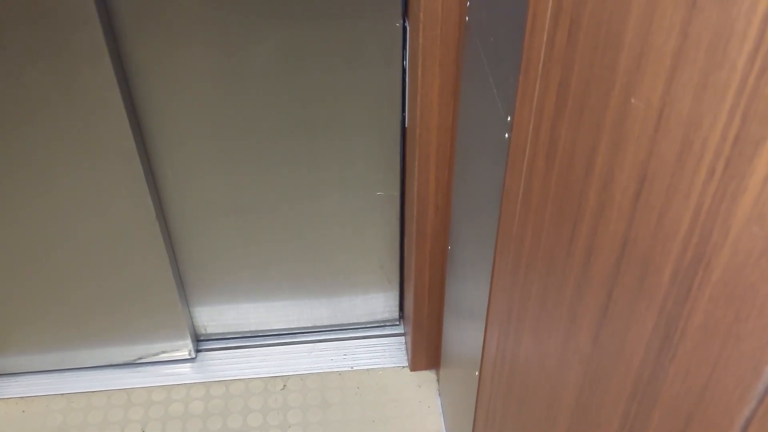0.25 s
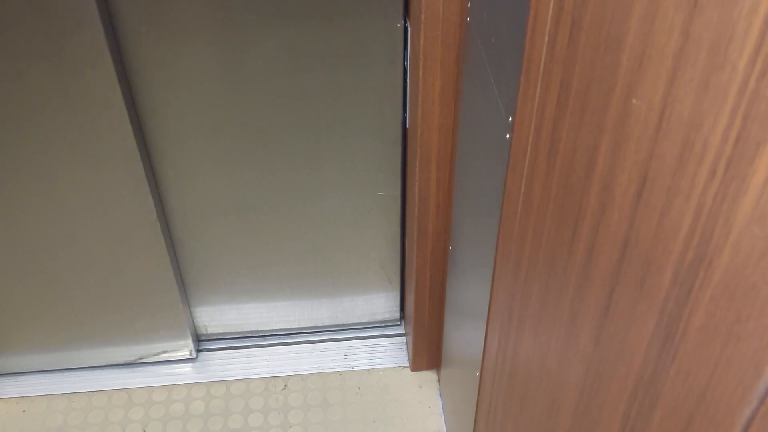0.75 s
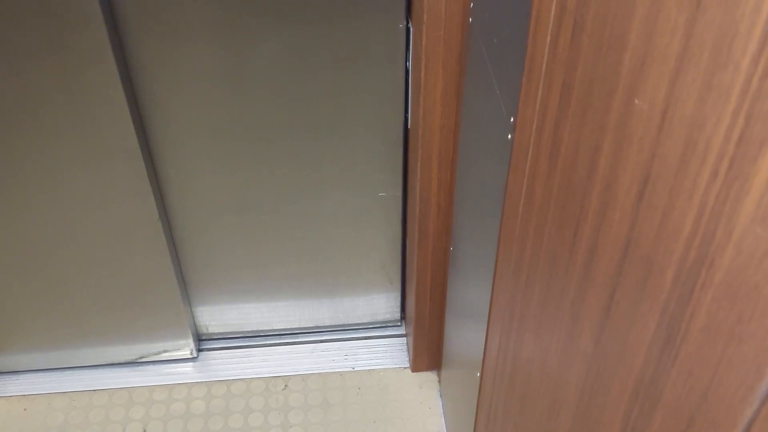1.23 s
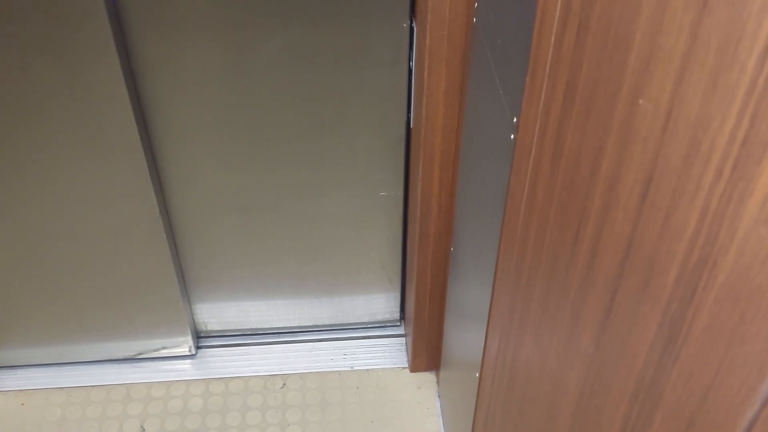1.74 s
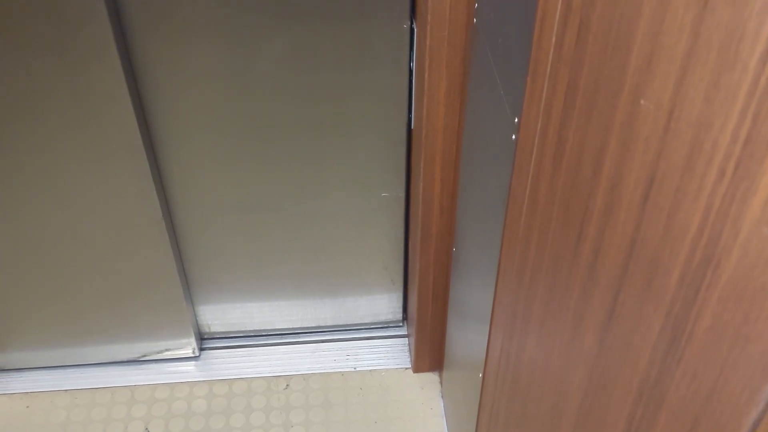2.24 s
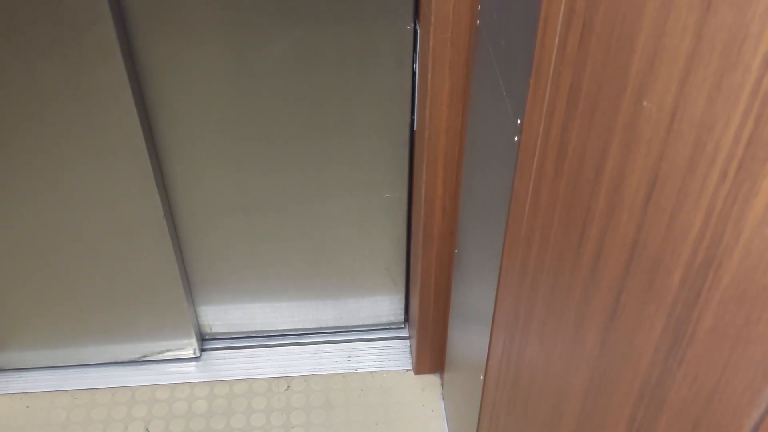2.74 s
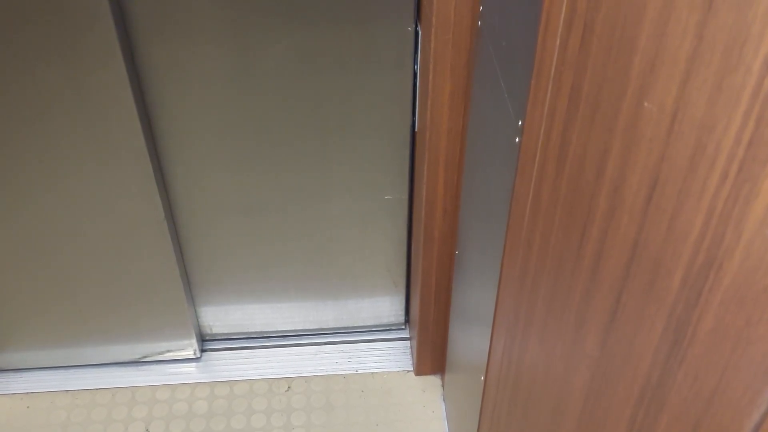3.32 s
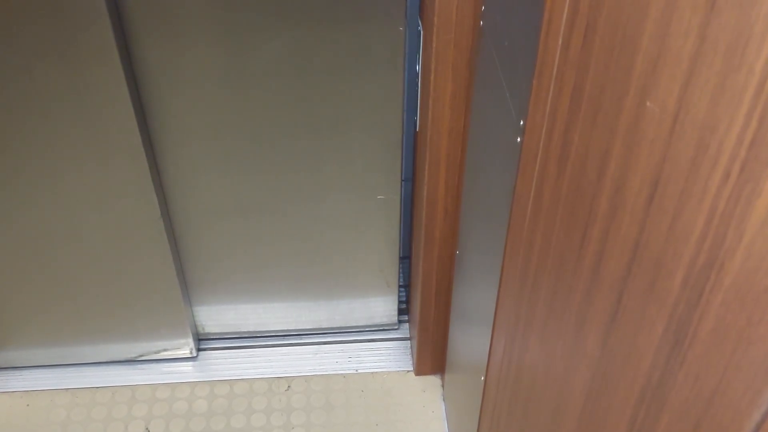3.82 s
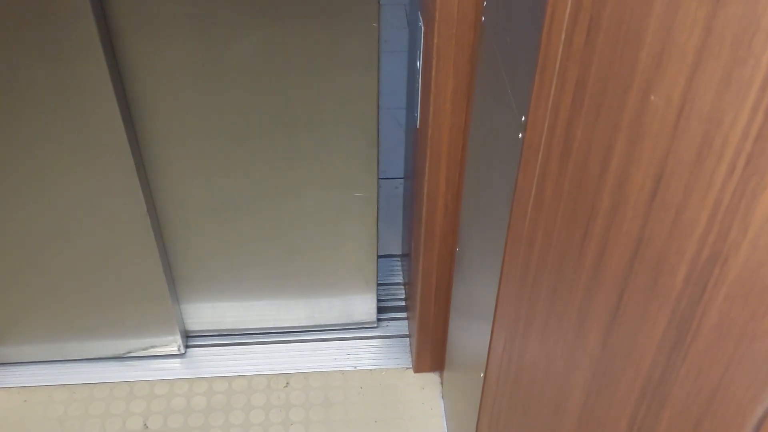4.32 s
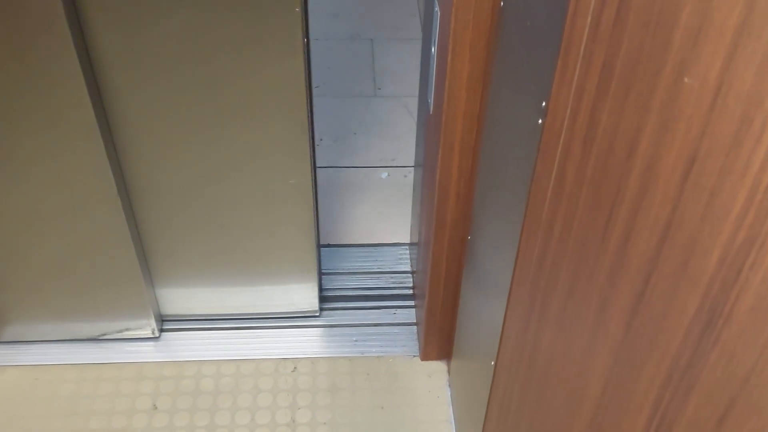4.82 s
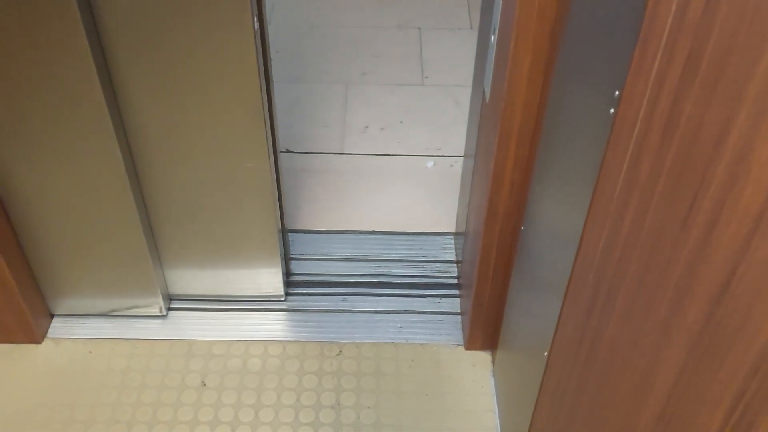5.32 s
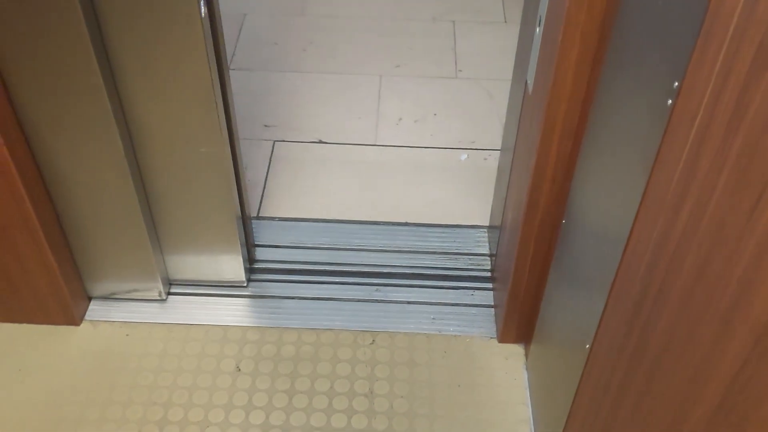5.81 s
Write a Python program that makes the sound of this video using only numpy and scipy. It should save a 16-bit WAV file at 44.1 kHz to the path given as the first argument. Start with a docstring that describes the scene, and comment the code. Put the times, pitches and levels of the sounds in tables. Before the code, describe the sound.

Inside a small elevator, a low wavering hum slows, the car stops with heavy clunks and thumps, then steel doors roll open with a rumbling whir.

```python
"""Inside a small elevator car: under a faint switching whistle, the hum of the drive and shaped rumble carry it
along the shaft, with wavering sine drones of the panels that fade in and out and a light rustle of the guides.
It slows and stops with a clunk and a heavy thump: noise bursts and struck modes that ring on in the hard cabin.
The door coupler whines in narrow noise bands as it takes up its slack, and the lock clicks.
Two steel panels then roll open: rumble, scrape and hiss follow the door speed over throbbing drive tones."""
import sys
import numpy as np
from scipy import signal
from scipy.fft import rfft, irfft, next_fast_len
from scipy.io import wavfile
from scipy.ndimage import uniform_filter1d, map_coordinates

SR = 44100
rng = np.random.default_rng(int(sys.argv[2]) if len(sys.argv) > 2 else 0)


def digitize_waveform(pressure):
    """Quantize a signal to 16-bit integers and store it at the path in sys.argv[1].

    Rows of a 2-D input are taken as channels; values are limited to [-1, 1].
    """
    field = np.atleast_2d(pressure).T
    bounded = np.clip(field, -1, 1)
    quanta = np.round(bounded * 32767).astype(np.int16)
    wavfile.write(sys.argv[1], SR, quanta)


N = 267290  # length in samples


def amp(db):
    """Level law: decibels to amplitude gain."""
    return 10 ** (np.asarray(db) / 20)


def unit(x):
    """Normalisation: scale to rms 1."""
    return x / np.sqrt(np.mean(x ** 2) + 1e-20)


def along(points, hz):
    """Logarithmic interpolation: read (f/Hz, value) points on a log frequency axis."""
    f, value = np.transpose(points)
    return np.interp(np.log(hz + 1), np.log(f + 1), value)


def curves(rows):
    """Linear interpolation: one value per sample for each column after the time."""
    s, *columns = np.transpose(rows)
    return [np.interp(np.arange(N) / SR, s, column) for column in columns]


def wobble(rate):
    """Band-limited fluctuation: a smooth random curve with rate knots per second."""
    knots = rng.standard_normal(1024)
    return map_coordinates(knots, [np.arange(N) * rate / SR], mode="mirror")


def swell(start, end, fade):
    """Amplitude envelope: a sine-shaped gain that fades in from start and out towards end, all in s."""
    t = np.arange(N) / SR
    return np.sin(np.pi / 2 * np.clip(np.minimum(t - start, end - t) / fade, 0, 1))


def tone(hz, drift, rate):
    """Frequency modulation: a sine of rms 1 whose pitch wanders by the share drift."""
    cycles = np.cumsum(hz * (1 + drift * wobble(rate))) / SR
    return np.sqrt(2) * np.sin(2 * np.pi * cycles)


def lift(resonances, hz):
    """Resonance: the dB that a set of bell-shaped peaks and dips adds at each frequency."""
    return sum(db / (1 + (2 * (hz - centre) / width) ** 2) for centre, width, db in resonances)


def standing_waves(hz, depth_db=3.0, spacing_hz=13):
    """Modal overlap: dense random cabin modes ripple the spectrum, from 250 Hz up and fully from 750 Hz."""
    knots = rng.standard_normal(4096)
    ripple = np.interp(hz / spacing_hz, np.arange(len(knots)), knots)
    return depth_db * np.clip(hz / 500 - .5, 0, 1) * ripple


def octave_band(hz, centre, octaves):
    """Band-pass response in dB: down 3 dB at the given octaves to each side of the centre."""
    return -10 * np.log10(1 + (np.log2((hz + 1) / centre) / octaves) ** 4)


# likeness of left and right in diffuse sound: f/Hz, coherence
COHERENCE = [(130, 0.97), (290, 0.91), (640, 0.24), (1300, -0.21), (3000, 0.0071), (15000, -0.18)]


def noise(colour_db, size=N):
    """Diffuse field: coloured stereo noise of rms 1, alike in the bass and nearly unrelated in the treble."""
    m = next_fast_len(size, True)
    hz = np.fft.rfftfreq(m, 1 / SR)
    # the angle divides the power between mid and side
    angle = np.arccos(np.clip(along(COHERENCE, hz), -1, 1)) / 2
    z = rfft(rng.standard_normal((2, m))) * amp(colour_db(hz)) * [np.cos(angle), np.sin(angle)]
    mid, side = irfft(z, m)[:, :size]
    return unit(np.array([mid + side, mid - side]))


# reverberation of the cabin: f/Hz, t60/s
REVERBERATION = [(80, 0.9), (200, 0.36), (500, 0.58), (1500, 0.48), (4000, 0.4), (8000, 0.46),
                 (15000, 0.15)]


def die_away(x):
    """Reverberant decay: each band of x falls 60 dB in the cabin's own time."""
    hz, t, z = signal.stft(x, SR, nperseg=512)
    decay_db = -60 * t / along(REVERBERATION, hz)[:, None]
    return signal.istft(z * amp(decay_db), SR, nperseg=512)[1][:, :x.shape[1]]


def add(track, s, x):
    """Superposition: mix x into the track at time s."""
    part = track[:, max(round(s * SR), 0):][:, :x.shape[1]]
    part += x[:, :part.shape[1]]


# switching whistle, before its trim: t/s, level/dB
WHISTLE_LEVEL = [(0, -62), (2.0, -70), (2.9, -75), (3.7, -69), (4.9, -73), (6.06, -88)]
# spectrum of the shaft air: f/Hz, relative density/dB per Hz
AIR_SPECTRUM = [(30, -1), (300, 22.5), (800, 4), (1200, 5), (2100, 4.5), (3000, -1.5), (6000, -5.5),
                (10000, -4.5), (14000, -4), (15300, 12.5)]


def background(air_db=-65.5, whistle_db=1, waver_db=4.5):
    """Broadband flow noise of the shaft air and the wavering switching tone of the drive electronics."""
    level, = curves(WHISTLE_LEVEL)
    carrier = 2 * np.pi * 15687 * np.arange(N) / SR  # 15687 Hz
    whistle = []
    # at so short a wavelength the strength and phase differ from left to right
    for channel in "LR":
        gain = amp(level + whistle_db + waver_db * wobble(4.4))
        whistle.append(gain * np.sqrt(2) * np.sin(carrier + 1.0 * wobble(3)))
    air = noise(lambda hz: along(AIR_SPECTRUM, hz) + standing_waves(hz))
    return amp(air_db) * air + np.array(whistle)


# the car cruises, then slows; the stop leaves it shuddering on its ropes; a faint rumble of the shaft stays
CRUISE_DB, SLOWS_AT_S, SLOWING_DB_PER_S, IDLE_DB = -44.5, 1.19, 10, -55
STOP_S, SHUDDER_DB, SHUDDER_RISE_S, SHUDDER_DB_PER_S = 2.456, -32, 0.072, 17.5


def shaking():
    """Energy addition: the shaking by the travel, by the stop and at rest sums as mean squares."""
    t = np.arange(N) / SR
    travel = amp(CRUISE_DB - SLOWING_DB_PER_S * np.maximum(t - SLOWS_AT_S, 0))
    since = np.maximum(t - STOP_S, 0)
    shudder = amp(SHUDDER_DB - SHUDDER_DB_PER_S * since) * (1 - np.exp(-since / SHUDDER_RISE_S))
    return np.sqrt(travel ** 2 + shudder ** 2 + amp(IDLE_DB) ** 2)


# hum of the drive as the car travels and as it stands, before its trim: t/s, level/dB
HUM_IN_TRAVEL = [(0.0, -50), (0.16, -75), (0.24, -42), (0.76, -36.5), (0.8, -63), (0.89, -38.5),
                 (0.92, -55), (1.44, -38), (1.57, -54), (1.65, -41.5), (1.83, -38.5), (1.91, -54),
                 (2.28, -42.5)]
HUM_AT_REST = [(3.2, -40), (3.812, -55.5), (3.832, -45), (4.05, -69)]
# the hum's pitch rises a little up to the moment the car slows
HUM_CRUISE_HZ, HUM_BRAKING_HZ, HUM_GLIDE_S = 90.2, 94.7, 0.29
# spectrum of the ride: f/Hz, relative density/dB per Hz
RIDE_SPECTRUM = [(20, -30), (40, -1.5), (70, 3.5), (115, -2), (165, -2.5), (235, -4), (300, -16),
                 (450, -19.5), (600, -31), (1000, -41), (2500, -67), (6000, -100)]
# resonances of the cabin, shared with the booms of the blows: f/Hz, width/Hz, lift/dB
CABIN_RESONANCES = [(50, 20, -7.5), (93, 7.8, 2.5), (130, 17, -3), (162.7, 15.7, 7.5), (188.7, 2.2, 7.5),
                    (245.7, 26, 7.5), (334, 32, 6), (419, 6.3, -5)]


def ride(hum_db=-2, flutter_db=2.5, rumble_db=0, restless_db=0.0):
    """Forced vibration: the drive hums through the ropes, the guide shoes shake the cabin's resonances."""
    level, = curves(np.vstack([HUM_IN_TRAVEL, HUM_AT_REST]))
    pitch, = curves([(SLOWS_AT_S - HUM_GLIDE_S, HUM_CRUISE_HZ), (SLOWS_AT_S, HUM_BRAKING_HZ)])
    hum = amp(level + hum_db + flutter_db * wobble(18)) * tone(pitch, drift=0.019, rate=25)

    def colour(hz):
        return along(RIDE_SPECTRUM, hz) + lift(CABIN_RESONANCES, hz) + standing_waves(hz)

    return hum + shaking() * amp(rumble_db + restless_db * wobble(19)) * noise(colour)


def guide_rattle(rattle_db=-76, uneven_db=3, centre_hz=4400, octaves=1.9):
    """Sliding friction: the guide shoes rustle lightly and fade out by the time the car slows."""
    gain = amp(rattle_db + uneven_db * wobble(16.5)) * swell(-np.inf, SLOWS_AT_S, fade=0.7)
    return gain * noise(lambda hz: octave_band(hz, centre_hz, octaves))


# wall panel tones, five in travel and one set off by the stop: start t/s, end t/s, f/Hz, mean level/dB
PANEL_DRONES = [(0.046, 0.99, 197.1, -51.5), (0.554, 1.245, 163.3, -46.5), (0.896, 2.407, 244.3, -54.5),
                (1.58, 2.197, 328, -64.5), (0.116, 0.66, 407, -71), (2.578, 3.118, 232, -45)]


def drones():
    """Panel resonance: tones that swell, waver and fade, five in travel and one set off by the stop."""
    out = 0
    for start, end, hz, db in PANEL_DRONES:
        gain = amp(db + 3.2 * wobble(14)) * swell(start, end, fade=0.22)
        out = out + gain * tone(hz, drift=0.00652, rate=15)
    return out


# sharp clicks of switch and lock: t/s, level of the echo before the snap/dB, centre f/Hz
CLICK_EVENTS = [(0.3106, -54.5, 9500), (2.577, -58, 10500), (3.709, -61.5, 4740)]
# soft brushes of the guides and door gear: t/s, level/dB, centre f/Hz, half-width/octave
BRUSH_EVENTS = [(.146, -69.5, 5500, 1.4), (.611, -71, 6460, 0.37), (.8, -77, 3600, 0.76),
                (1.452, -69, 3200, 1.3), (2.094, -63.5, 5960, 0.5), (2.22, -62, 14500, 0.18),
                (2.323, -64, 11500, .76), (2.369, -56.5, 8500, 1.1), (2.411, -62, 12000, .4),
                (3.213, -66, 7040, .25)]
CLICK_OCTAVES, CLICK_RISE_S, BRUSH_RISE_S = 0.74, 0.00024, 0.011


def ticks(snap_db=8, snap_life=0.00055):
    """Contact excitation: clicks snap, brushes swell, and both leave the cabin's bright reverberation."""
    out, t = np.zeros((2, N)), np.arange(SR // 2) / SR

    def echo(centre, octaves):
        return die_away(noise(lambda hz: octave_band(hz, centre, octaves), size=SR // 2))

    snap = (1 + amp(snap_db) * np.exp(-t / snap_life)) * (1 - np.exp(-t / CLICK_RISE_S))
    for s, db, centre in CLICK_EVENTS:
        add(out, s, amp(db) * snap * echo(centre, CLICK_OCTAVES))
    brush = 1 - np.exp(-t / BRUSH_RISE_S)
    for s, db, centre, octaves in BRUSH_EVENTS:
        add(out, s, amp(db) * brush * echo(centre, octaves))
    return out


def ring(modes, t, scatter_db=1.5):
    """Modal superposition: each blow lands elsewhere, so modes answer with new strengths and phases."""
    mode_hz, mode_db, t60 = np.transpose(modes)[:, :, None]
    level = mode_db + rng.normal(0, scatter_db, mode_hz.shape) - 60 * t / t60
    phase = rng.uniform(0, 2 * np.pi, mode_hz.shape)
    # higher modes are further out of step between left and right
    phase = phase + rng.standard_normal((2, len(modes), 1)) * mode_hz / 1200
    return np.sum(amp(level) * np.sin(2 * np.pi * mode_hz * t + phase), axis=1)


# blows of brake, coupler and lock, before trims and decay:
# t/s, boom level/dB, panel ring level/dB, metal clatter level/dB
BLOWS = [(2.099, -67, -65, -62), (2.227, -57, -53.5, -73), (2.303, -26, -33.5, -57), (2.332, -27, -47, -48),
         (2.382, -27.5, -34, -46.5), (2.44, -31, -37.5, -47.5), (2.549, -24, -21.5, -43.5),
         (2.577, -17.5, -21, -32.5), (2.628, -20.5, -40, -41), (2.675, -23, -38, -43.5),
         (2.775, -26.5, -48, -56.5), (2.863, -32, -38, -42), (3.221, -53, -53, -67),
         (3.28, -43, -51.5, -56), (3.39, -43, -49.5, -63), (3.53, -44, -41.5, -62),
         (3.829, -48.5, -59.5, -76), (4.071, -43, -61, -78)]
# modes of the car's panels, and of the coupler and lock steel: f/Hz, relative level/dB, t60/s
PANEL_MODES = [(310, -29, 0.52), (345, -0.5, 0.63), (422, -1.5, 0.75), (426, -9.5, 0.56), (444, -3.5, 0.73),
               (516, -9, 0.88), (548, -2.5, 0.52), (675.4, -10, 0.7), (800, -15.5, 0.67)]
STEEL_MODES = [(1405, -22, 0.48), (1565, 3, 0.25), (1637, -7, 0.35), (1740, -3, 0.36), (1967, -5.5, 0.52),
               (2260, -5, 0.36), (2370, -1, 0.35)]
# spectra of boom, panel wash and clatter: f/Hz, relative density/dB per Hz
BOOM_SPECTRUM = [(20, -63), (50, -40), (85, -12), (150, 2), (210, -2.5), (280, -2.5), (380, -27.5),
                 (700, -31), (2000, -69)]
PANEL_SPECTRUM = [(100, -24), (280, -12.5), (420, 7.5), (560, 1), (780, -8), (1100, -22), (2500, -25),
                  (6000, -99)]
CLATTER_SPECTRUM = [(200, -51), (800, 4.5), (1150, -5), (1700, -0.5), (2500, -5.5), (4000, -6.5),
                    (6000, -12), (8500, -12.5), (10500, -20), (16000, -41)]
# a soft blow is dull above SOFT_HZ; a harder one gains an octave per DB_PER_OCTAVE and rises faster
SOFT_HZ, SOFT_RISE_S, HARD_ABOVE_DB, DB_PER_OCTAVE = 2400, 0.011, -45, 12.5


def knocks(modes_db=-8, wash_db=-3, steel_db=-12):
    """Impact excitation: each blow booms in the cabin, rings the wall panels and rattles the loose steel."""
    size = SR * 3 // 4
    out, t = np.zeros((2, N)), np.arange(size) / SR

    def boom_colour(hz):
        return along(BOOM_SPECTRUM, hz) + lift(CABIN_RESONANCES, hz) / 2

    for s, boom_db, ring_db, clatter_db in BLOWS:
        hardness = 2 ** (max(clatter_db - HARD_ABOVE_DB, 0) / DB_PER_OCTAVE)
        dull_hz, rise = SOFT_HZ * hardness, SOFT_RISE_S / np.sqrt(hardness)

        def metal_colour(hz):
            contact = -10 * np.log10(1 + (hz / dull_hz) ** 3)  # a softer contact has less treble
            ripple = standing_waves(hz, depth_db=4.0, spacing_hz=44.77)
            return along(CLATTER_SPECTRUM, hz) + contact + ripple

        boom = amp(boom_db) * noise(boom_colour, size=size)
        wash = amp(ring_db + wash_db) * noise(lambda hz: along(PANEL_SPECTRUM, hz), size=size)
        clatter = amp(clatter_db) * noise(metal_colour, size=size)
        panels = amp(ring_db + modes_db) * ring(PANEL_MODES, t)
        steel = amp(clatter_db + steel_db) * ring(STEEL_MODES, t)
        add(out, s, (die_away(boom + wash + clatter) + panels + steel) * (1 - np.exp(-t / rise)))
    return out


# the doors speed up evenly, then ease off by a share of their top speed each second
DOOR_START_S, DOOR_RUN_UP_S, DOOR_EASING_PER_S = 4.025, 0.73, 0.17


def door_speed():
    """Kinematics: uniform acceleration, then slow easing, as a share of the top speed."""
    since = np.arange(N) / SR - DOOR_START_S
    eased = 1 - DOOR_EASING_PER_S * np.maximum(since - DOOR_RUN_UP_S, 0)
    return np.clip(np.minimum(since / DOOR_RUN_UP_S, eased), 0, 1)


def whir(centre, width, db, uneven_db, rate):
    """Friction noise confined to a narrow band, with a fluctuating level where uneven_db is not 0."""
    def colour(hz):
        band = -10 * np.log10(1 + (2 * (hz - centre) / width) ** 4)
        return band + standing_waves(hz)

    return amp(db + uneven_db * wobble(rate)) * noise(colour)


# the coupler sings and scrapes as it takes up its slack: start t/s, end t/s, f/Hz, width/Hz, level/dB
COUPLER_BANDS = [(2.21, 3.4, 1978, 370, -74), (3.2, 3.45, 2100, 1300, -67.5),
                 (3.201, 4.205, 7668, 5700, -78.5), (3.414, 3.694, 680, 500, -58.5),
                 (3.65, 4.305, 1169, 652.3, -72)]
# belt and bearings, before scaling by the door speed: f/Hz, width/Hz, level/dB
BELT_BANDS = [(2300, 900, -55), (3260, 260, -58), (6800, 740, -63)]
BEARING_BANDS = [(9000, 99.3, -68), (9530, 200, -64.5)]
# the belt sings in fits while it pulls the doors up to speed, then relaxes
BELT_RELAXES_S, BEARINGS_START_S = 5.28, 4.62


def whirs():
    """Friction-excited resonance: coupler, belt and bearings each sing in narrow bands as they move."""
    coupler = 0
    for start, end, *band in COUPLER_BANDS:
        coupler = coupler + swell(start, end, fade=0.093) * whir(*band, uneven_db=0.5, rate=30)
    belt = sum(whir(*band, uneven_db=3.0, rate=18) for band in BELT_BANDS)
    belt = belt * swell(DOOR_START_S, BELT_RELAXES_S, fade=.5)
    bearings = sum(whir(*band, uneven_db=0.0, rate=4.42) for band in BEARING_BANDS)
    bearings = bearings * swell(BEARINGS_START_S, np.inf, fade=.15)
    return coupler + door_speed() * (belt + bearings)


def at_speed(top_db, db_per_decade):
    """Power law: the gain of a door noise that grows with the doors' speed."""
    return amp(top_db + db_per_decade * np.log10(door_speed() + 1e-6))


def rubbing(x, patchy_db=1.5):
    """Moving contact point: resonances a few hundred Hz wide come and go."""
    z = signal.stft(x, nperseg=512)[2]
    field = uniform_filter1d(rng.standard_normal(z.shape[1:]), size=3, axis=0)  # across frequency
    field = uniform_filter1d(field, size=24, axis=1)  # along time
    return unit(signal.istft(z * amp(patchy_db * unit(field)), nperseg=512)[1][:, :N])


# resonances of the door leaves and track: f/Hz, width/Hz, lift/dB
TRACK_RESONANCES = [(49.6, 7.3, 5), (135, 9.9, 5.5), (161, 6.8, 8.5), (249.7, 13, 11.5), (447.5, 12, 7),
                    (590, 38, -1), (696, 18, 7.5), (1544, 63, 4), (1908, 84, 7)]
# spectra of rollers, shoes and seals: f/Hz, relative density/dB per Hz
ROLL_SPECTRUM = [(20, -32), (45, -6), (65, -5), (95, 3.5), (170, 2), (235, -1.5), (300, -9.5), (420, -8),
                 (600, -7.5), (800, -14.5), (1100, -24), (2500, -51), (6000, -90)]
SCRAPE_SPECTRUM = [(300, -17), (900, 2.5), (1400, 2), (1750, -4), (2300, -1), (3200, -7.5), (4500, -13.5),
                   (7000, -15.5), (12000, -21)]
HISS_SPECTRUM = [(1500, -19), (4000, -3), (7000, -4.5), (10200, -8), (11500, -1), (13700, -10.5),
                 (15500, 0)]
# mean level at top speed/dB, gain per tenfold speed/dB
ROLLERS, SHOES, SEALS = (-29.5, 31.6), (-46, 18.4), (-50.5, 19.5)


def doors(bumps_db=0.87, grit_db=1.0):
    """Rolling and sliding contact: rollers shake the leaves, guide shoes scrape the sill, the seals hiss."""
    bumps = bumps_db * wobble(22)

    def through_leaves(spectrum):
        return noise(lambda hz: along(spectrum, hz) + lift(TRACK_RESONANCES, hz) + standing_waves(hz))

    rumble = at_speed(*ROLLERS) * amp(bumps) * through_leaves(ROLL_SPECTRUM)
    grit = amp(bumps / 2 + grit_db * wobble(120))
    scrape = at_speed(*SHOES) * grit * rubbing(through_leaves(SCRAPE_SPECTRUM))
    hiss = at_speed(*SEALS) * amp(bumps / 2) * through_leaves(HISS_SPECTRUM)
    return rumble + scrape + hiss


# low partials of the door drive at top speed, before the throb: f/Hz, level/dB
LOW_PARTIALS = [(165.7, -36.5), (250.3, -45)]
# beating pair of gear tones: f/Hz, mean level/dB
GEAR_PAIR = [(476.5, -42), (459, -52)]
# the door drive throbs once for each turn of its pulley, by THROB_DB up and down
THROB_HZ, THROB_PEAK_S, THROB_DB = 5.18, 4.79, 4
# the gear tones swell and fade while the doors run
GEAR_START_S, GEAR_END_S, GEAR_FADE_S = 4.317, 6.09, 0.84


def door_motor(flutter_db=-0.5, drone_growth=3.5, gear_flutter_db=2.0):
    """Amplitude modulation and beats: two low partials throb under a pair of gear tones."""
    def partials(rows, depth_db):
        return sum(amp(db + depth_db * wobble(14)) * tone(hz, drift=0.0072, rate=20) for hz, db in rows)

    t = np.arange(N) / SR
    throb = amp(THROB_DB * np.cos(2 * np.pi * THROB_HZ * (t - THROB_PEAK_S)))
    drone = door_speed() ** drone_growth * throb * partials(LOW_PARTIALS, flutter_db)
    gears = swell(GEAR_START_S, GEAR_END_S, GEAR_FADE_S) * partials(GEAR_PAIR, gear_flutter_db)
    return drone + gears


def scene():
    """Superposition: everything as heard from the middle of the car."""
    travel = background() + ride() + guide_rattle() + drones()
    contacts = ticks() + knocks()
    return travel + contacts + whirs() + doors() + door_motor()


# lean of the sound: f/Hz, left minus right level/dB
STEREO_LEAN = [(70, -0.9), (150, -2), (300, -4.5), (600, -4), (1100, 0.2), (2200, -3), (4500, -0.6),
               (9000, 0.5)]
TOP_HZ = 15830  # upper band limit


def record(dry):
    """Linear filtering: a level difference by frequency, mostly to the right, and a sharp upper band limit."""
    m = next_fast_len(N + SR // 4, True)
    hz = np.fft.rfftfreq(m, 1 / SR)
    lean = along(STEREO_LEAN, hz) / 2
    return irfft(rfft(dry, m) * amp([lean, -lean]) * (hz < TOP_HZ), m)[:, :N]


dry = scene()
out = record(dry)
digitize_waveform(out)
```